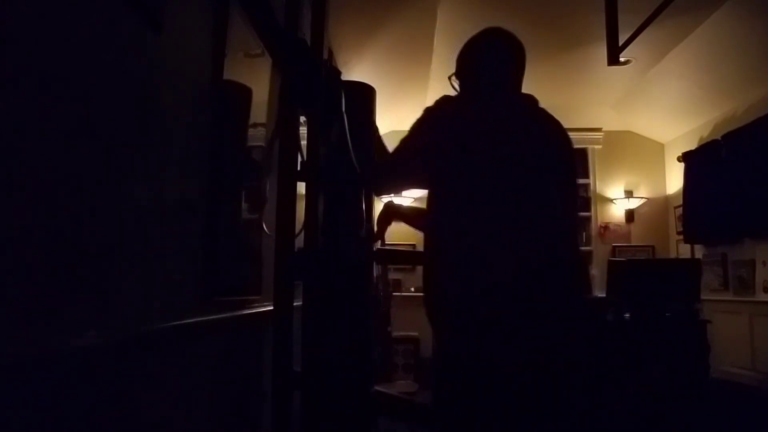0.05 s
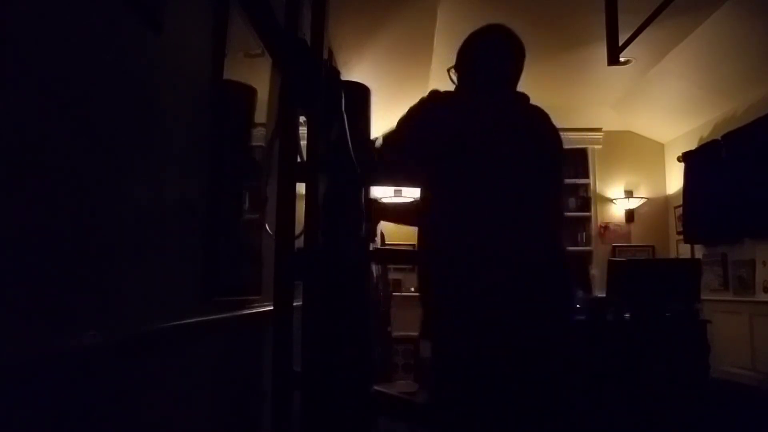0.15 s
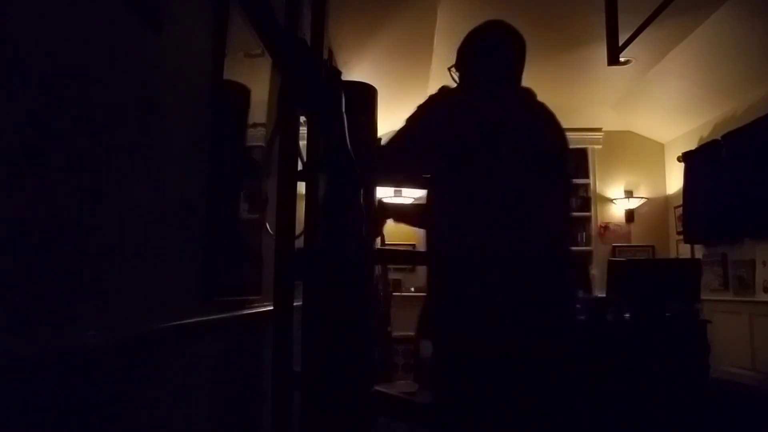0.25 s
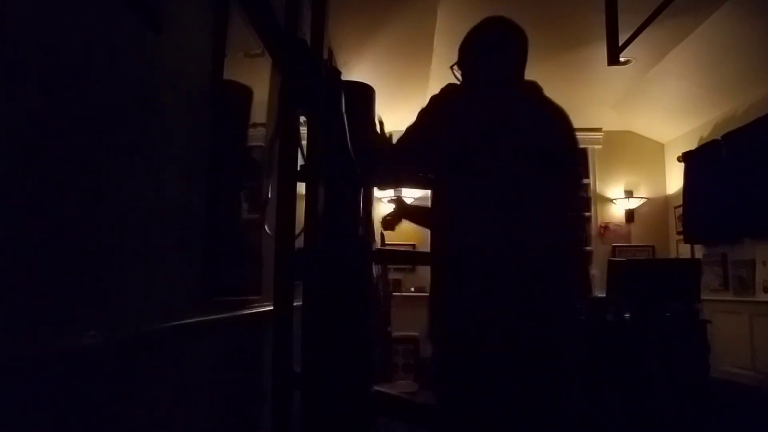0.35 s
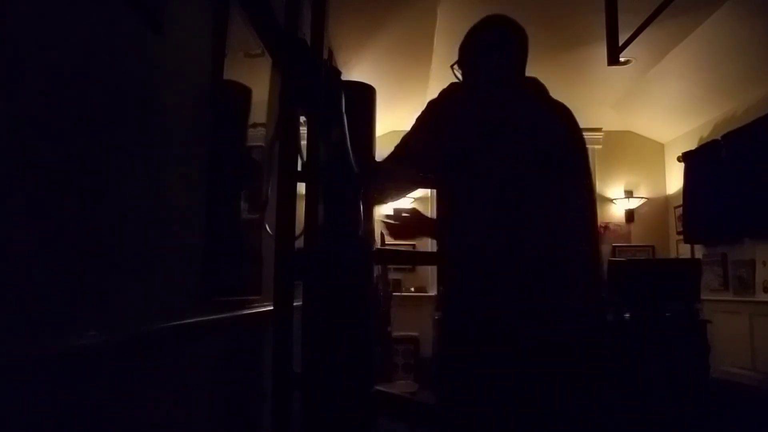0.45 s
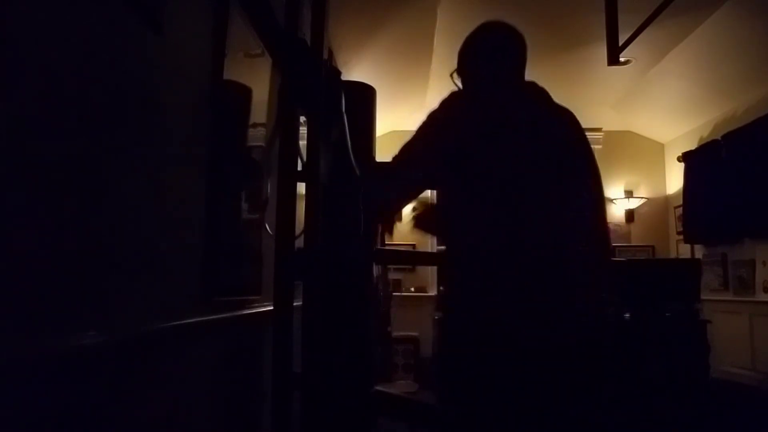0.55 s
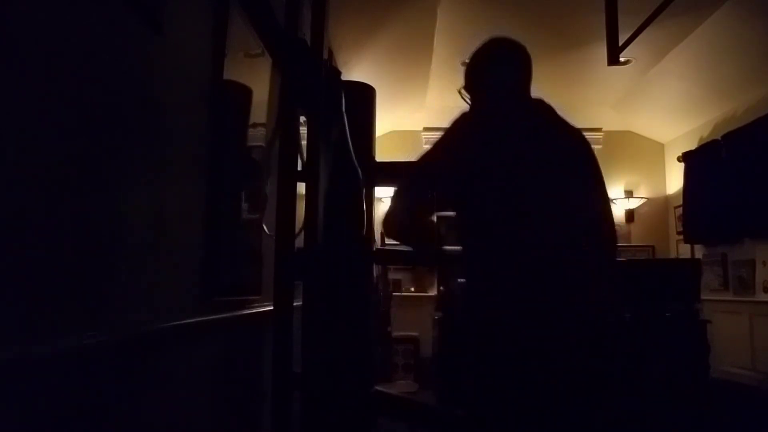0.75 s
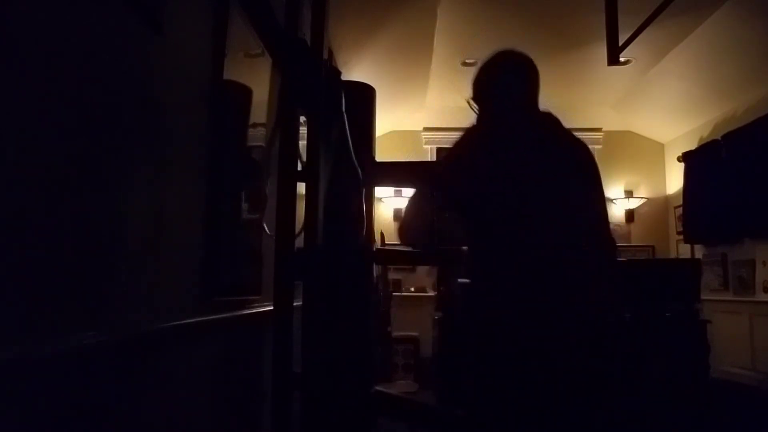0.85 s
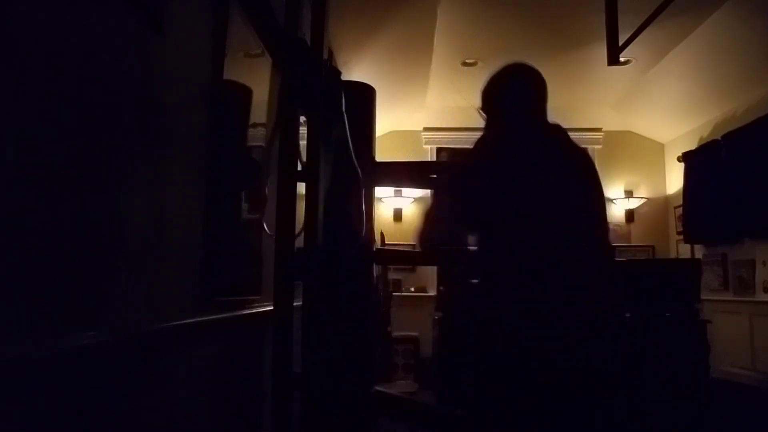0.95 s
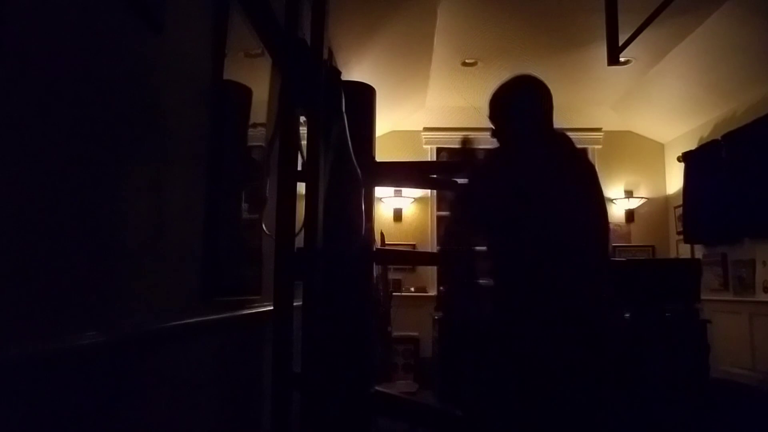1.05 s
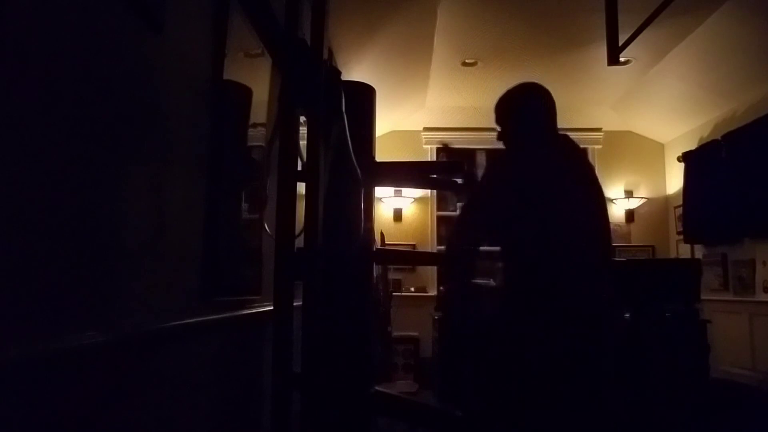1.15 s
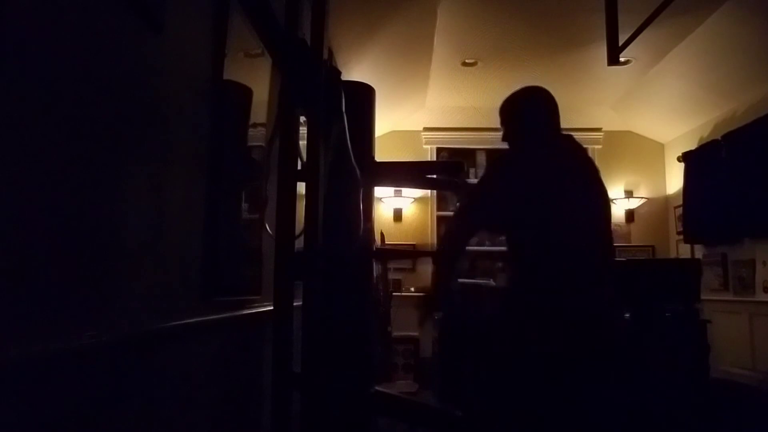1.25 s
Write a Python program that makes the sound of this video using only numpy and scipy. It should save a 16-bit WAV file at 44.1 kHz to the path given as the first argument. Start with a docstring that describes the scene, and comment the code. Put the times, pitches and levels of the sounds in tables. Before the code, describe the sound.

A quick clatter of knocks from a wooden practice dummy, then soft footsteps indoors.

```python
"""A quiet living room rumbles faintly; an earlier blow dies away under two soft steps.
From 0.2 s, forearms strike a wooden training dummy. Each blow thumps the trunk and throws
the loose wooden arms about in their sockets: a quick rattle of ringing knocks and small ticks.
After 0.6 s the rattle fades. From about 1.1 s, soft footfalls make the floor boom
and a sleeve brushes the wood."""
import sys
import numpy as np
from scipy import signal
from scipy.fft import rfft, irfft
from scipy.io import wavfile

SR = 44100
rng = np.random.default_rng(int(sys.argv[2]) if len(sys.argv) > 2 else 0)


def dump_mix(stems):
    """Bounce the given channels to the path in sys.argv[1] as a 16-bit WAV at rate SR."""
    frames = np.atleast_2d(stems).T  # one column per channel
    limited = np.clip(frames, -1, 1)  # hard clip at full scale
    pcm = np.round(limited * 32767).astype(np.int16)
    wavfile.write(sys.argv[1], SR, pcm)


N = 57330
TIME, FREQS = np.arange(N) / SR, np.fft.rfftfreq(N, 1 / SR)
RIGHT_LAG_S, RING_ATTACK_S = 0.000417, 0.0007


def from_db(db):
    """Turn decibels into a number to multiply by."""
    return 10 ** (np.asarray(db) / 20)


def rms_one(x):
    """Scale a sound so that its average strength (rms) is 1."""
    return x / np.sqrt(np.mean(x ** 2) + 1e-20)


def at_hz(points, hz):
    """Read between the rows of a table, with octaves evenly spaced."""
    freqs, values = np.transpose(points)
    return np.interp(np.log(np.maximum(hz, 1)), np.log(freqs), values)


def level(points):
    """Join (time, level) points into a loudness curve."""
    return from_db(np.interp(TIME, *np.transpose(points)))


def fade(t60, attack_s):
    """Rise quickly, then die away; t60 is the time it takes to fall by 60 dB."""
    return np.exp(-np.log(1000) * TIME / t60) * (1 - np.exp(-TIME / attack_s))


def convolve(x, response):
    """Let every sample of x set off a copy of the response."""
    return signal.fftconvolve(np.atleast_2d(x), np.atleast_2d(response), axes=1)[:, :N]


def colour(points, size=8192):
    """A short burst with the given tone colour and an energy of 1."""
    gains = from_db(at_hz(points, np.fft.rfftfreq(size, 1 / SR)))
    cepstrum = irfft(np.log(gains))
    cepstrum[1:size // 2] *= 2   # this fold packs the energy at the start
    cepstrum[size // 2 + 1:] = 0
    return rms_one(irfft(np.exp(rfft(cepstrum)))) / np.sqrt(size)


def direct(x, lag_s):
    """Sound coming straight to us reaches the right ear a little later."""
    x = np.ravel(x)
    return np.array([x, np.interp(TIME - lag_s, TIME, x, left=0)])


def clicks(times, levels_db):
    """One sharp push for each contact."""
    out = np.zeros(N)
    np.add.at(out, np.clip((times * SR).astype(int), 0, N - 1), from_db(levels_db))
    return out


def chatter(times, levels_db, swell_s, size=1024):
    """Surfaces chatter as they meet: a tiny noise swells and dies at each contact."""
    out, age = np.zeros(N + size), np.arange(size) / SR / swell_s
    for s, db in zip(times, levels_db):
        start = int(s * SR)
        burst = rms_one(rng.standard_normal(size) * age * np.exp(-age))
        out[start:start + size] += from_db(db) * burst / np.sqrt(size)
    return out[:N]


def struck(force, spectrum, tail, direct_db):
    """A hit wakes many short vibrations, heard straight and through the room."""
    sound = convolve(force, colour(spectrum)) * np.sqrt(0.031 * SR)   # levels are rms over 31 ms
    return from_db(direct_db) * direct(sound, RIGHT_LAG_S) + convolve(sound, tail)


def ring(force, tones, attack_s):
    """Each hit sets an object's own tones ringing and fading."""
    sines = sum(from_db(db) * np.sin(2 * np.pi * hz * TIME) * fade(t60, attack_s)
                for hz, db, t60 in tones)
    return convolve(force, sines)


def rattled(force, tones, attack_s, longest_t60=np.inf):
    """Repeated hits top up each fading tone, which wavers as the wood shifts."""
    wander_rad, wander_s = 0.45, 0.025
    out = 0
    for hz, db, t60 in tones:
        decay = fade(min(t60, longest_t60), attack_s)
        energy = np.maximum(convolve(force ** 2, decay ** 2), 0)
        wander = wander_rad * np.interp(TIME / wander_s, np.arange(N), rng.standard_normal(N))
        phase = 2 * np.pi * (hz * TIME + rng.random()) + wander
        out = out + from_db(db) * np.sqrt(energy) * np.sin(phase)
    return out


# how alike the room sounds in both ears: f/Hz, likeness (1 = the same)
EAR_LIKENESS = [(60, 1), (125, 0.95), (250, 0.84), (550, 0.88), (1000, 0.017), (2000, 0.18), (4000, 0.029),
                (12000, 0.04)]
def diffuse_noise():
    """Hiss from all around, alike in both ears in the bass and unrelated in the treble."""
    alike = np.clip(at_hz(EAR_LIKENESS, FREQS), -.99, .995)
    mid, side = rfft(rng.standard_normal((2, N)))
    return irfft(np.sqrt(1 + alike) * mid + np.sqrt(1 - alike) * side * [[1], [-1]], N)


def wash(spectrum):
    """Steady noise with the given tone colour, falling away below the table's lowest row."""
    bass_cut = np.minimum(FREQS / spectrum[0][0], 1) ** 2
    return rms_one(irfft(rfft(diffuse_noise()) * from_db(at_hz(spectrum, FREQS)) * bass_cut, N))


# how long the room echoes: f/Hz, t60/s
ECHO_TIMES = [(60, 1), (150, 0.65), (400, .48), (900, 0.3), (2000, 0.34), (4000, 0.3), (8000, 0.24),
              (14000, 0.28)]
def room_tail():
    """The room's echo of one click: each band of pitch dies at its own rate."""
    edges = np.r_[0, np.geomspace(70, SR / 2, 25)]
    noise, out = rfft(diffuse_noise()), 0
    for low, high in zip(edges, edges[1:]):
        decay = fade(at_hz(ECHO_TIMES, (low + high) / 2), attack_s=0.0013)
        band = irfft(noise * ((FREQS >= low) & (FREQS < high)), N) * decay
        out = out + rms_one(band) * np.sqrt(2 * (high - low) / SR / N)   # wider bands get more energy
    return out


# tone colour of the room's rumble: f/Hz, level/dB
RUMBLE_COLOUR = [(25, -23), (46, 1.5), (85, -2), (150, -7), (230, -4.5), (370, -13.5), (650, -8),
                 (1200, -19.5), (2200, -28.5), (3200, -27), (6000, -42.5), (14000, -43.5), (16000, -59)]
def rumble():
    """The room rumbles faintly all the time."""
    return from_db(-48.5) * wash(RUMBLE_COLOUR)


# tone colour of the sound still hanging in the room: f/Hz, level/dB
LINGER_COLOUR = [(59, -29), (100, -5), (361, -11), (673, 3), (738, 0.5), (809, 4), (1150, -13),
                 (1350, -0.5), (1990, -27), (2300, -2.5), (2610, -35), (3140, -26), (8000, -84.5),
                 (10400, -90), (17600, -120)]
# how that sound fades: t/s, level/dB
LINGER_FADE = [(0, -36.5), (0.06, -39), (0.11, -42), (0.16, -50.5), (0.21, -52), (0.35, -61)]
def earlier_blow():
    """An earlier blow dies away, along with its clack (coloured like the arms' clack below)."""
    clack_t60_s = 0.3
    clack = from_db(-41.5) * np.exp(-np.log(1000) * TIME / clack_t60_s) * wash(CLACK_COLOUR)
    return clack + level(LINGER_FADE) * wash(LINGER_COLOUR)


# tone colour of the rubbing cloth: f/Hz, level/dB
SLEEVE_COLOUR = [(150, 1.5), (400, -6.5), (1130, -6.5), (1410, -19), (1880, -14.5), (2300, -26.5),
                 (3600, -25.5), (7000, -43.5), (14000, -41)]
# how the rubbing grows: t/s, level/dB
SLEEVE_SWELL = [(1.08, -86), (1.16, -63), (1.22, -51.5), (1.255, -42), (1.268, -37), (1.3, -38)]
def sleeve():
    """A sleeve brushes the wood with a swell of soft noise."""
    return level(SLEEVE_SWELL) * wash(SLEEVE_COLOUR)


# feet landing: t/s, boom level/dB, scuff level/dB
FOOTFALLS = [(0.064, -38, -43.5), (0.115, -35.5, -40.5), (0.839, -52.5, -52.5), (1.0, -57, -73),
             (1.115, -41, -42), (1.131, -22.5, -44.5), (1.184, -39, -56), (1.262, -31, -37.5),
             (1.282, -37, -46)]
# the floor's deep tones: f/Hz, level/dB, t60/s
FLOOR_TONES = [(41, -1, 0.13), (52.9, -3, 0.37), (68.3, -4, 0.17), (104, -10, 0.23)]
# tone colour of a scuff: f/Hz, level/dB
SCUFF_COLOUR = [(40, -19), (150, 7.5), (420, -3), (700, -3.5), (1200, -18), (2500, -44), (8000, -53)]
def feet(tail):
    """Soft steps scuff the floor and make it boom."""
    times, boom_db, scuff_db = np.transpose(FOOTFALLS)
    boom = ring(clicks(times, boom_db), FLOOR_TONES, attack_s=0.006)
    return boom + struck(clicks(times, scuff_db), SCUFF_COLOUR, tail, direct_db=-4)


# blows landing on the trunk: t/s, thud level/dB, sway level/dB
TRUNK_BLOWS = [(0.213, -33.5, -21.5), (0.2366, -24, -17.5), (0.25, -21, -19), (0.267, -33, -39),
               (0.295, -28, -45), (0.32, -22, -36), (0.373, -29, -44.5), (0.414, -20.5, -34.5),
               (0.460, -24.5, -23), (0.477, -26, -28), (0.595, -32.5, -27.5)]
# tone colour of the dull thud: f/Hz, level/dB
THUD_COLOUR = [(25, -16), (60, -10.5), (90, -11), (125, -0.5), (200, -3), (330, -5.5), (500, -9.5),
               (1200, -16.5), (4000, -79)]
# the frame's low tones: f/Hz, level/dB, t60/s
FRAME_TONES = [(51.44, -9.5, 0.92), (68.44, -2.5, 0.27), (119.2, -4, .22), (139, -5.5, 0.4),
               (220, -6.5, 0.41), (291.7, -15, 0.38)]
def trunk(tail):
    """The trunk takes the weight of each blow: it thuds and its frame sways."""
    times, thud_db, sway_db = np.transpose(TRUNK_BLOWS)
    thud = struck(clicks(times, thud_db), THUD_COLOUR, tail, direct_db=-4)
    return thud + rattled(clicks(times, sway_db), FRAME_TONES, attack_s=0.0058)


# glancing touches: t/s, level/dB
GLANCES = [(0.218, -40), (0.2745, -46.5), (0.2941, -47), (0.3597, -45.5), (0.3763, -55), (0.4507, -44.5),
           (0.5025, -49.5), (0.5075, -44.5), (0.52, -78), (0.5445, -36), (0.898, -70)]
# tone colour of a tick: f/Hz, level/dB
TICK_COLOUR = [(2500, 5.5), (4500, 7), (7000, -0.5), (8400, -2.5), (9800, 1), (10800, -4), (11900, 3.5),
               (12600, -4.5), (13200, -1), (14400, -4), (16000, -15)]
def ticks(tail):
    """Glancing touches give thin, bright ticks."""
    times, levels_db = np.transpose(GLANCES)
    return struck(chatter(times, levels_db, swell_s=0.0016), TICK_COLOUR, tail, direct_db=1)


# wooden edges meeting: t/s, level/dB, f/Hz
EDGE_SNAPS = [(0.217, -16, 2004), (0.3605, -5, 2159), (0.3625, -22, 4500), (0.3815, -4.5, 1975),
              (0.4005, -24, 2160), (0.478, -7.5, 2322)]
def snaps(tail, t60_s=0.021, room_db=-4.5):
    """One edge snaps against another: a brief clack with its own pitch."""
    sound = sum(ring(clicks(np.array([s]), db), [(hz, 0, t60_s)], RING_ATTACK_S)
                for s, db, hz in EDGE_SNAPS)
    return direct(sound, RIGHT_LAG_S) + from_db(room_db) * convolve(sound, tail)


# arms hitting their sockets: t/s, then level/dB of hollow knock, clack, upper arm, lower arm
ARM_KNOCKS = [(0.2165, -35, -32.5, -54, -53), (0.2445, -27.5, -27, -51, -21.5),
              (0.264, -23.5, -30.5, -54.5, -45.5), (0.2916, -22.5, -24, -18, -45),
              (0.2985, -17.5, -24, -10.5, -21.5), (0.3145, -27, -28.5, -13, -36),
              (0.3385, -12, -25, -38.5, -13.5), (0.3598, -42, -27.5, -40, -15.5),
              (0.3765, -14.5, -25.5, -43, -29.5), (0.381, -31, -25.5, -41, -45.5),
              (0.399, -25, -29, -42, -19), (0.4378, -19, -27, -38, -32), (0.4775, -25.5, -23.5, -29, -46),
              (0.494, -20, -42.5, -15, -16.5), (0.5055, -13.5, -19.5, -19, -8.5),
              (0.518, -14, -44, -30.5, -36), (0.5316, -20.5, -35, -37, -16), (0.5435, -19, -27, -37, -15.5),
              (0.577, -20.5, -34, -48, -16.5), (0.595, -30.5, -37, -28.5, -40),
              (0.72, -45.5, -51, -45, -45)]
# tone colours of the hollow knock and the hard clack: f/Hz, level/dB
HOLLOW_COLOUR = [(150, -30), (300, -19), (450, -12.5), (620, -1.5), (850, 2.5), (1050, 2.5), (1270, 3),
                 (1430, -18), (2000, -17.5), (5000, -67), (15000, -66.5)]
CLACK_COLOUR = [(700, -49), (1400, 1), (1850, 3), (2300, -2.5), (3000, -9), (3700, -11.5), (4700, -22),
                (6200, -31), (9000, -47), (15000, -59)]
# tones of the two wooden arms: f/Hz, level/dB, t60/s (cut to longest_t60 below)
UPPER_TONES = [(695, -14, .3), (1011, -17, .25), (1176, 0, .2), (1235, -7, .09), (1561, -24, .28),
               (1930, -20, .25), (2148, -18, .25)]
LOWER_TONES = [(537, -17.5, 0.38), (600, -7, 0.25), (851.7, -0.5, 0.2), (881, -2, 0.13), (928.7, -6, 0.26),
               (1088, -10.5, 0.161), (1230, -6, 0.15), (1320, -15.5, 0.43), (1720, -21.5, 0.46),
               (2045, -18, .2)]
# faint tones of the metal fittings: f/Hz, level/dB, t60/s
METAL_TONES = [(3120, -44.5, 1.3), (4950, -61.5, 1.3)]
def arms(tail, longest_t60=0.38, ring_room_db=-7.5):
    """The loose arms knock and clack in their sockets, setting wood and metal fittings ringing."""
    times, hollow_db, clack_db, upper_db, lower_db = np.transpose(ARM_KNOCKS)
    knocks = clicks(times, hollow_db)
    hollow = struck(knocks, HOLLOW_COLOUR, tail, direct_db=-6)
    clack = struck(chatter(times, clack_db, swell_s=0.0015), CLACK_COLOUR, tail, direct_db=-6)
    upper = rattled(clicks(times, upper_db), UPPER_TONES, RING_ATTACK_S, longest_t60)
    lower = rattled(clicks(times, lower_db), LOWER_TONES, RING_ATTACK_S, longest_t60)
    metal = rattled(knocks, METAL_TONES, RING_ATTACK_S)
    near = direct(upper + lower, lag_s=0.00013) * from_db([[1.4], [-1.4]])   # louder on the left
    echo = convolve(from_db(ring_room_db) * (upper + lower) + metal, tail)
    return hollow + clack + near + echo


def scene():
    """The dummy, the person and the background share one room."""
    tail = room_tail()
    dummy = arms(tail) + snaps(tail) + ticks(tail) + trunk(tail)
    background = earlier_blow() + rumble()
    person = feet(tail) + sleeve()
    return (dummy + background + person) * from_db([[-0.83], [0.83]])   # left a little down, right up


def record(dry):
    """Round off the tallest peaks and cut the highest treble."""
    cutoff_hz = 15300
    rounded = dry / (1 + dry ** 6) ** (1 / 6)
    return signal.sosfilt(signal.ellip(10, .2, 80, cutoff_hz, fs=SR, output="sos"), rounded)


dry = scene()
out = record(dry)
dump_mix(out)
```